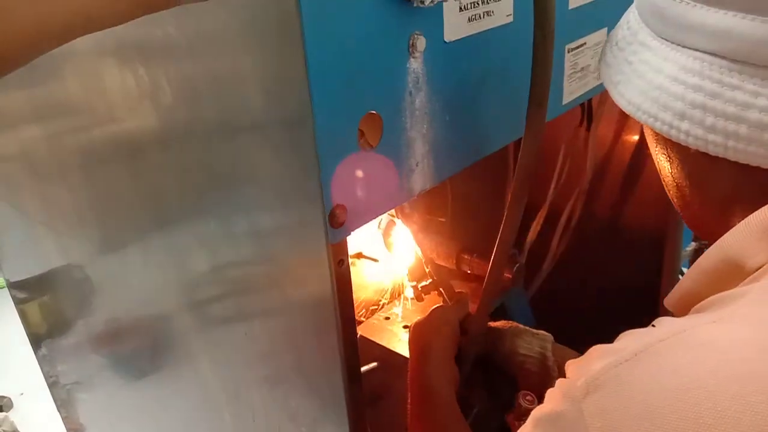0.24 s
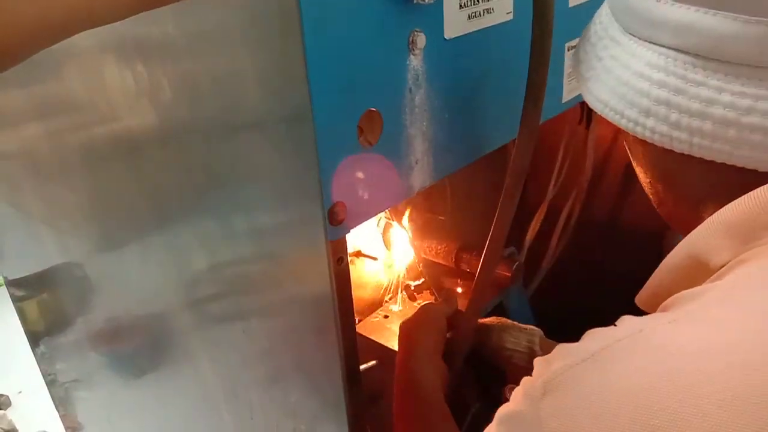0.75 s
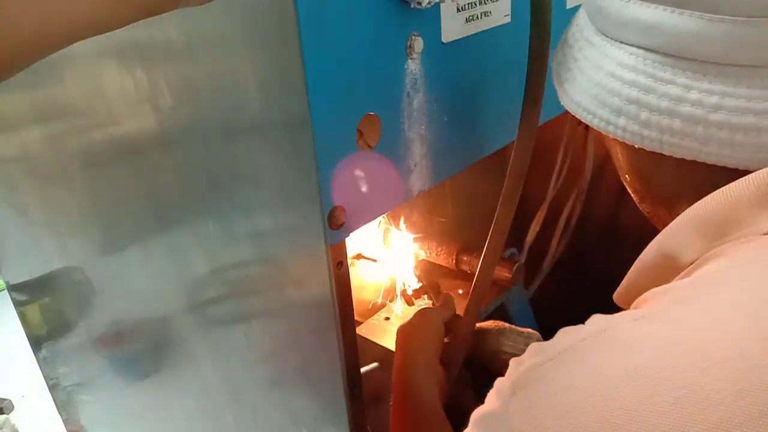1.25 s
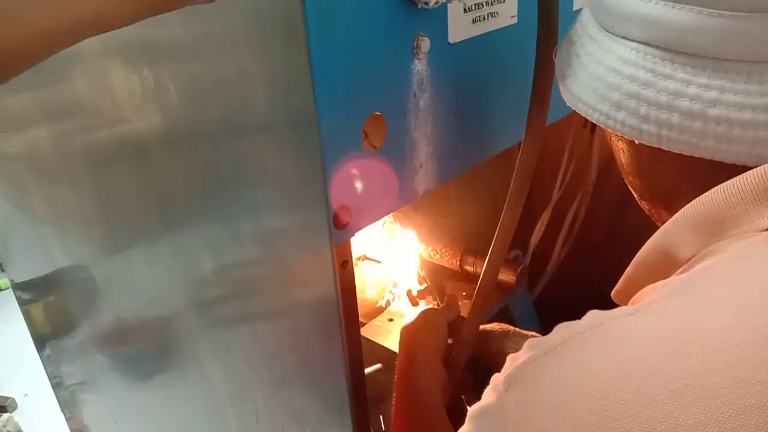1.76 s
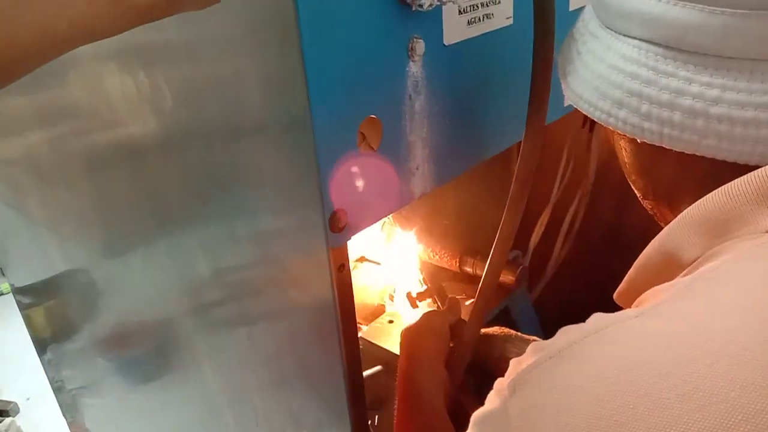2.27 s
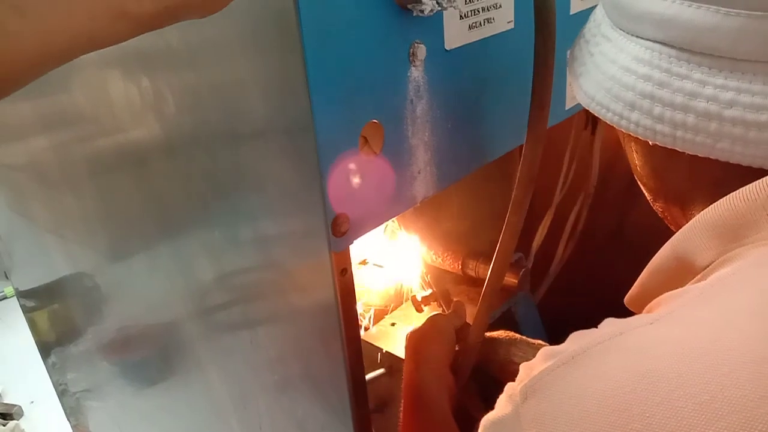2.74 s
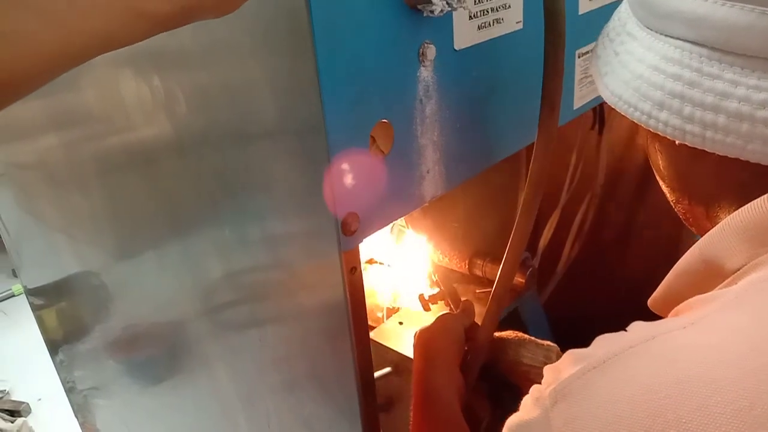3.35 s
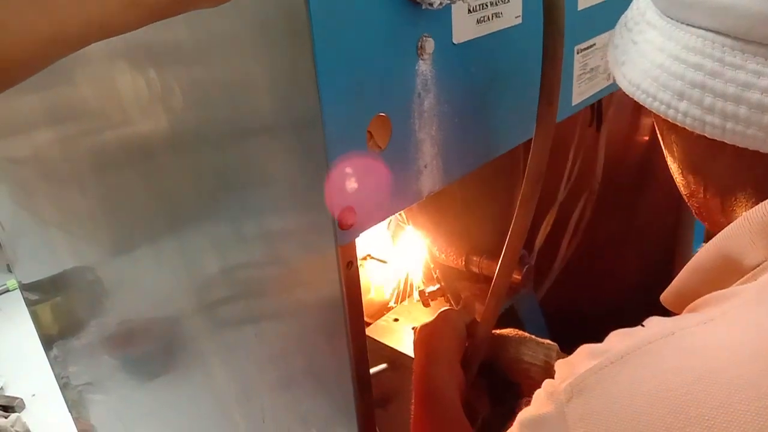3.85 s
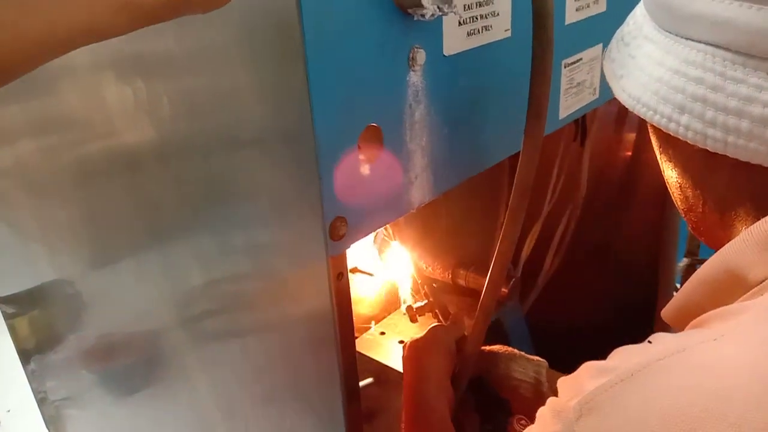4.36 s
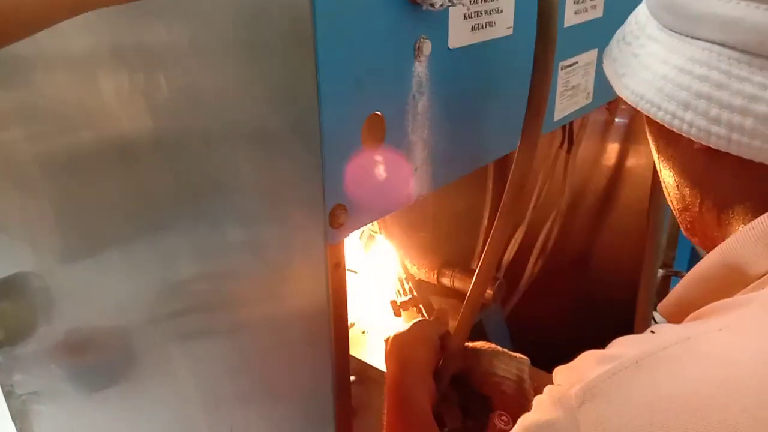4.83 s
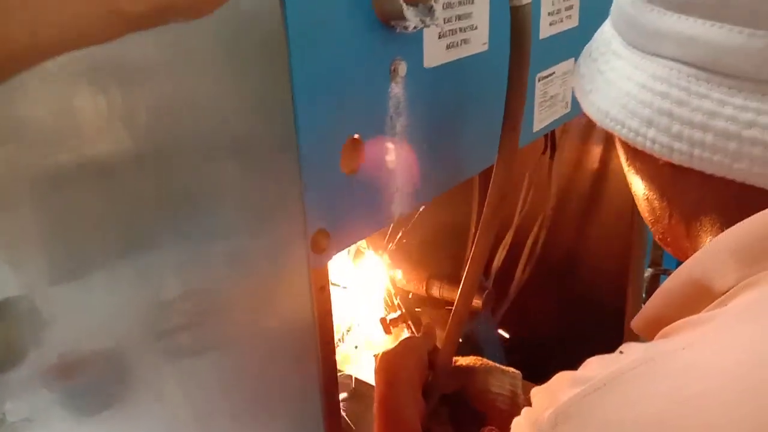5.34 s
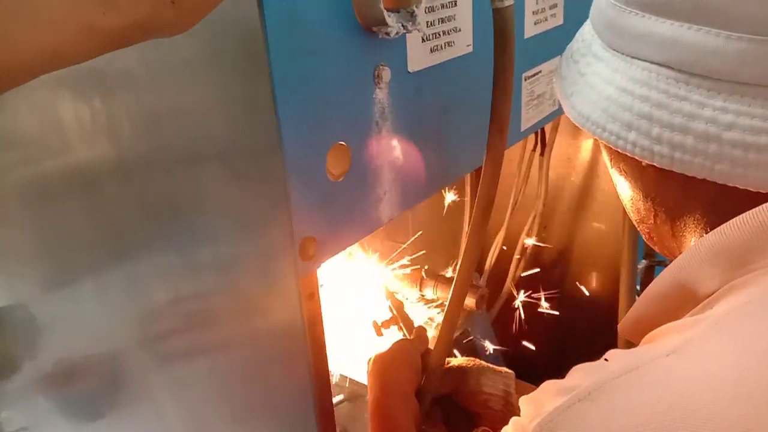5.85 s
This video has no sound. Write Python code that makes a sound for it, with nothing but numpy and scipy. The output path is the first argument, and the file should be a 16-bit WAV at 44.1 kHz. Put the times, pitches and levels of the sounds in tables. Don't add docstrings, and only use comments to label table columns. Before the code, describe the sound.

From 0 seconds a gas torch is already roaring close by inside an open steel cabinet, and it never stops. The sound is dense, broad hiss with a rough midrange roar, light bass puffs and a constant nervous flutter. Between 0.4 and 2 seconds the flame surges and falters in quick gusts, with a thin high whistle emerging around 0.7. From 2 to 4 it is steadier, with hollow, beating metallic panel ring; a sharp crack and short bright fizz of slag comes at 2.65, a weaker one at 3.7. The roar swells most around 4.3, then eases. From 5 to 6.1 it flutters in short dips and surges, growing hissier as the whistle returns. Short steel-wall echoes colour everything. A phone at arm's length hears it nearly mono, peaks softly rounded, top end cut, with very faint side noise.

```python
import sys
import numpy as np
from scipy import signal
from scipy.fft import rfft, irfft
from scipy.io import wavfile
from scipy.ndimage import uniform_filter1d

SR = 44100
rng = np.random.default_rng(int(sys.argv[2]) if len(sys.argv) > 2 else 0)


def volts_from_decibels(level):
    exponent = np.asarray(level, float) / 20
    return 10 ** exponent


def store_wav(level_fs):
    pcm = np.round(np.clip(np.atleast_2d(level_fs), -1, 1) * 32767)
    wavfile.write(sys.argv[1], SR, pcm.T.astype(np.int16))


N = 268877
HZ = np.fft.rfftfreq(N, 1 / SR)
TIME_S = np.arange(N) / SR

# frequency in Hz, level in dB per Hz.
JET_SPECTRUM = [(25, -48), (55, -43), (85, -30.5), (180, -19), (450, -16.5), (700, -17), (1250, -13.5),
                (2300, -15), (4000, -16.5), (7600, -23), (8200, -34.5), (11000, -36.5), (13500, -43.5),
                (15000, -36)]
# start in seconds, length in seconds, level in dB.
PUFFS = [(0.028, 0.079, -42), (0.511, 0.13, -39), (0.744, 0.038, -48), (0.818, 0.038, -42),
         (1.393, 0.045, -40.5), (1.68, 0.032, -43), (1.825, 0.071, -40), (1.933, 0.056, -36),
         (2.534, 0.126, -40), (2.69, 0.056, -38), (2.804, 0.06, -36.5), (3.024, 0.061, -47),
         (3.937, 0.496, -42.5), (4.576, 0.077, -44), (4.827, 0.035, -47), (5.12, 0.06, -42),
         (5.575, 0.047, -39), (5.676, 0.12, -41.5), (5.914, 0.16, -37.5)]
# centre in seconds, change in dB, length in seconds.
LULLS = [
    (0.684, -8, 0.082),
    (1.597, -1, 0.091),
    (2.1, -1, 0.1),
    (2.78, -4, .06),
    (3.795, -5, 0.15),
    (5.32, -4, 0.13),
]


def torch(controls, wander_db=0.6, flutter_db=0.6, eddy_db=1.1, puff_db=1.6):
    draught_db = follow((-58, 1.3, -0.2, 1.1, 0.5), controls)
    rumble_db = swells(PUFFS, follow((-44, -0.05, 0.06, 0.16, 0.14), controls), -0.5)
    for s, db, length_s in LULLS:
        rumble_db = rumble_db + db * np.exp(-(2 * (TIME_S - s) / length_s) ** 2)
    roar_db = follow((-27, 1.09, -0.14, 0.89, 0.03), controls)
    hiss_db = follow((-32, 0.85, 0.64, 0.33, 0.9), controls)
    sizzle_db = follow((-45.5, 0.08, 1.97, 0.1, 0.7), controls)
    zone_db = [draught_db, rumble_db, roar_db, hiss_db, sizzle_db]
    zone_edges_hz = (150, 500, 2500, 8000)

    spectrum_hz, spectrum_db = np.transpose(JET_SPECTRUM)
    jet_db = np.interp(np.log(HZ + 1), np.log(spectrum_hz), spectrum_db)
    gas = rfft(walls(rng.standard_normal(N))) * volts_from_decibels(jet_db + cabinet_db())
    zones = np.zeros((len(zone_db), N))
    puffs_db = puff_db * walk(11)
    for hz in 31 * 2 ** np.arange(0, 9.5, 0.5):
        zone = np.searchsorted(zone_edges_hz, hz)
        band = irfft(gas * tent(hz, 0.51), N)
        band_db = wander_db * walk(3.14) + eddy_db * walk(14)
        if zone == 1:
            band_db = band_db + puffs_db
        zones[zone] += band * volts_from_decibels(band_db)
    all_flutter_db = flutter_db * walk(13)
    return sum(level(z) * volts_from_decibels(db + all_flutter_db) for z, db in zip(zones, zone_db))


# time in seconds, flame depth in the kerf in dB,
# nozzle aim out of the cabinet in dB.
HAND = [(0.0, -1.5, 0.0), (0.2, -4, -3.5), (0.9, -4, 1.1), (1.4, -1.7, 0.5), (2.2, -2.1, -1.5),
        (2.7, 0.9, -0.6), (3.3, 0.2, -1.5), (3.9, -1.7, -2), (4.3, 6.5, -0.8), (4.7, 1.76, 0.1),
        (5.3, 1.9, 0.6), (5.55, 1, 2), (6.1, 1.2, 2.5)]
# centre in seconds, flame change in dB, oxygen jet change in dB,
# length in seconds.
SURGES = [(0.214, -1.5, 4, 0.28), (0.49, 3.5, 5.5, 0.27), (0.76, 3.5, 4.5, 0.101), (0.857, 4.5, 2.5, 0.062),
          (0.965, 4.5, 4.5, 0.078), (1.139, -5, -2.5, 0.071), (1.279, 3, -1.8, 0.23),
          (1.322, 3.5, 2, 0.057), (1.453, 2.3, -0.5, 0.12), (1.53, -2.5, -3.5, 0.11),
          (1.697, 4.5, 0, 0.047), (1.8, 5.5, 0, 0.066), (1.93, 4.5, 1, 0.14), (2.769, -2.5, -0.5, 0.079),
          (2.926, -3, -1, 0.13), (3.194, -0.5, 2.5, 0.091), (3.403, -0.0, 2.0, 0.22),
          (3.894, 2.1, 1.5, 0.12), (4.131, -1, 3, 0.14), (4.296, -4, -2.5, 0.16), (4.589, -4, 0.3, 0.15),
          (5.002, -3, -0.5, 0.12), (5.41, -3.5, -3, 0.13), (5.541, -2.8, 2, 0.16), (5.67, -2.5, -5, 0.066),
          (5.752, 3.5, 1.5, 0.066), (5.909, 3.5, 2, 0.07), (6.064, 3, -2, 0.25)]


def drive():
    s, depth_db, aim_db = np.transpose(HAND)
    hand = [np.interp(TIME_S, s, db) for db in (depth_db, aim_db)]
    centre_s, flame_db, jet_db, length_s = np.transpose(SURGES)
    coarse_s = TIME_S[::64]
    bells = np.exp(-(2 * (coarse_s[:, None] - centre_s) / length_s) ** 2)
    surges = [np.interp(TIME_S, coarse_s, bells @ db) for db in (flame_db, jet_db)]
    return np.array(hand + surges)


def follow(layer, controls):
    return layer[0] + np.array(layer[1:]) @ controls


def swells(rows, bed_db, trim_db, edge_s=0.01):
    power = np.zeros(N)
    for s, length_s, db in rows:
        power[int(s * SR):int((s + length_s) * SR)] = volts_from_decibels(2 * (db + trim_db))
    edge = int(edge_s * SR)
    power = uniform_filter1d(uniform_filter1d(power, edge), edge)
    return 10 * np.log10(np.maximum(power, 0) + volts_from_decibels(2 * bed_db))


def level(x):
    return x / np.sqrt(np.mean(x ** 2))


def walk(rate_hz):
    hold = int(SR / rate_hz)
    steps = np.repeat(rng.standard_normal(N // hold + 1), hold)
    return 0.66 * uniform_filter1d(uniform_filter1d(steps, hold), hold)[:N]


def tent(hz, octaves):
    distance = np.log2((HZ + 1) / hz) / octaves
    return np.cos(np.pi / 2 * np.clip(distance, -1, 1)) ** 2


# frequency in Hz, width in Hz, lift in dB (dips negative).
CABINET_MODES = [(258, 30, -11), (85, 14, 5), (397, 16, 5), (570, 35, 6), (625, 40, -6), (653, 12, 7),
                 (805, 20, 4), (830, 20, -7), (960, 25, 3), (1077, 13, 9), (1110, 30, -3), (1310, 16, 8),
                 (1443, 18, 4), (1490, 28, 3), (1530, 22, -5), (1675, 70, -7), (1760, 20, 5), (1797, 16, 7),
                 (1880, 70, -5), (1962, 26, 4), (2080, 50, -6), (2330, 220, -5), (2589, 60, 4),
                 (3070, 140, 3), (3400, 100, -2), (4550, 120, -3), (4830, 90, 2), (5950, 200, 3),
                 (6230, 380, -5), (9240, 400, 2)]


def cabinet_db():
    return sum(db / (1 + (2 * (HZ - hz) / width_hz) ** 2) for hz, width_hz, db in CABINET_MODES)


def walls(x, count=4, t60_s=0.18, echo_db=-7.5, hand_rate_hz=1.163):
    tail_s = TIME_S[:SR // 4]
    echoes = rng.standard_normal((count, len(tail_s))) * volts_from_decibels(-60 * tail_s / t60_s)
    echoes /= np.linalg.norm(echoes, axis=1, keepdims=True)
    shares = np.array([walk(hand_rate_hz) for _ in echoes])
    shares /= np.linalg.norm(shares, axis=0)
    reflected = sum(share * signal.oaconvolve(x, echo)[:N] for share, echo in zip(shares, echoes))
    return x + volts_from_decibels(echo_db) * reflected


# start in seconds, length in seconds, level in dB.
PANEL_SWELLS = [(0.742, 0.055, -31), (0.846, 0.032, -34), (0.954, 0.047, -30), (1.251, 0.091, -27.5),
                (1.395, 0.071, -27.5), (1.487, 0.026, -26), (1.568, 0.16, -30), (1.788, 0.2, -28.5),
                (2.285, 0.12, -25.5), (2.454, 0.064, -29), (2.568, 0.03, -22), (2.67, 0.072, -32),
                (2.846, 0.067, -26), (2.953, 0.39, -25.5), (3.366, 0.1, -28), (3.51, 0.078, -31),
                (3.69, 0.044, -27), (3.815, 0.053, -29), (3.921, 0.062, -27), (4.057, 0.52, -25.5),
                (4.679, 0.17, -29.5), (4.887, 0.062, -35), (4.985, 0.064, -25.5), (5.12, 0.25, -31),
                (5.41, 0.29, -29.5), (5.755, 0.33, -39)]
# start in seconds, length in seconds, level in dB.
THRUMS = [(0.02, 0.12, -42.5), (1.662, 0.04, -50), (1.812, 0.063, -39), (1.94, 0.04, -54),
          (2.405, 0.045, -45.5), (2.796, 0.046, -45), (2.961, 0.15, -42), (3.913, 0.12, -39),
          (4.173, 0.192, -42), (4.552, 0.071, -41), (4.815, 0.044, -39), (5.547, 0.027, -47),
          (5.911, 0.042, -47)]
# frequency in Hz, width in Hz.
TURN_MODES = [
    (2190, 67),
    (3825, 330),
]
# time in seconds, frequency in Hz, level in dB.
KERF_WHISTLE = [
    (0, 7100, -63),
    (0.551, 7100, -59),
    (0.699, 6720, -42),
    (2.2, 6720, -51),
    (2.9, 7150, -67.5),
    (3.6, 7100, -43),
    (4.5, 6900, -64),
    (4.849, 7250, -54),
    (5.401, 7000, -46),
    (6.1, 7250, -42),
]


def ringing(controls):
    panel_db = swells(PANEL_SWELLS, follow((-36, 0.76, 1.9, 0.8, -0.5), controls), -2.5)
    out = resonance(1246, 15, panel_db - 3.5) + resonance(1265, 15, panel_db - 2.5)
    out += resonance(209, 20, swells(THRUMS, -59, -2.3))
    turn_layers = [(-42.5, 0.28, 0.6, 1, 0.61), (-42.5, 1.2, 0.14, 0.1, 1.7)]
    for (hz, width_hz), layer in zip(TURN_MODES, turn_layers):
        out += resonance(hz, width_hz, follow(layer, controls) + 1.9 * walk(4.56))
    s, hz, db = np.transpose(KERF_WHISTLE)
    return out + resonance(np.interp(TIME_S, s, hz), 290, np.interp(TIME_S, s, db))


def resonance(hz, width_hz, db):
    pole = np.exp(-np.pi * width_hz / SR)
    swing = rng.standard_normal((2, N))
    for _ in range(2):
        swing = signal.lfilter([1], [1, -pole], swing)
    swing /= np.sqrt(np.hypot(*swing))
    phase = 2 * np.pi * np.cumsum(hz * np.ones(N)) / SR
    return level(swing[0] * np.cos(phase) + swing[1] * np.sin(phase)) * volts_from_decibels(db)


# start in seconds, peak in dB, length in milliseconds.
SPITS = [
    (2.6505, -24.5, 28),
    (3.694, -34, 24),
]


def slag(low_hz=3000, trim_db=-10):
    gate = np.zeros(N)
    for s, db, length_ms in SPITS:
        age_ms = 1000 * (TIME_S - s)
        fizz = (age_ms > 0) * np.exp(-(np.clip(age_ms, 0, 200) / length_ms) ** 4)
        crack = 1.3 * np.exp(-np.abs(age_ms) / 3.5)
        gate += volts_from_decibels(db + trim_db) * fizz * (1 + crack)
    highpass = signal.butter(2, low_hz, "high", fs=SR, output="sos")
    return signal.sosfilt(highpass, gate * rng.standard_normal(N))


# time in seconds, centre in Hz.
TREBLE_PATCHES = [(1.018, 8600), (1.735, 5150), (1.737, 11700), (1.741, 14500), (2.064, 6900),
                  (2.066, 13100), (2.271, 5700), (2.443, 11700), (2.595, 5700), (2.6, 7550), (3.086, 10350),
                  (3.249, 10300), (3.251, 5700), (3.551, 4950), (4.109, 7550), (4.826, 4700)]


def patches(bass_count=40, spread=0.097, treble_db=-56, bass_db=-58):
    hop, first = 1024, 920
    bands = []
    spectrum_hz, spectrum_db = np.transpose(JET_SPECTRUM)
    for s, hz in TREBLE_PATCHES:
        band_db = np.interp(hz, spectrum_hz, spectrum_db) + 10 * np.log10(2 * spread * hz)
        bands.append((s, hz * (1 - spread), hz * (1 + spread), treble_db + band_db))
    for when, low in rng.random((bass_count, 2)):
        offset_hz = 400 * low ** 2
        bands.append((0.05 + 6 * when, 40 + offset_hz, 130 + offset_hz, bass_db - 18 * (1 - low)))

    side = np.zeros(N + 2 * hop)
    burst_hz = np.fft.rfftfreq(2 * hop, 1 / SR)
    for s, low_hz, high_hz, db in bands:
        inside = (burst_hz > low_hz) * (burst_hz < high_hz)
        burst = level(irfft(rfft(rng.standard_normal(2 * hop)) * inside))
        start = first + hop * (round((s * SR - first) / hop) - 1)
        side[start:start + 2 * hop] += volts_from_decibels(db + 3.5) * burst * np.hanning(2 * hop)
    return np.array([side[:N], -side[:N]])


def scene():
    controls = drive()
    return np.tile(torch(controls) + ringing(controls) + slag(), (2, 1))


def top_cut(x):
    return signal.sosfilt(signal.butter(12, 16810, fs=SR, output="sos"), x)


def record(dry):
    round_gain, top_hz = 1.2, 15500
    rounded = np.tanh(round_gain * dry) / round_gain
    dulled = irfft(rfft(rounded) * (HZ < top_hz), N)
    return top_cut(dulled + patches())


dry = scene()
out = record(dry)
store_wav(out)
```